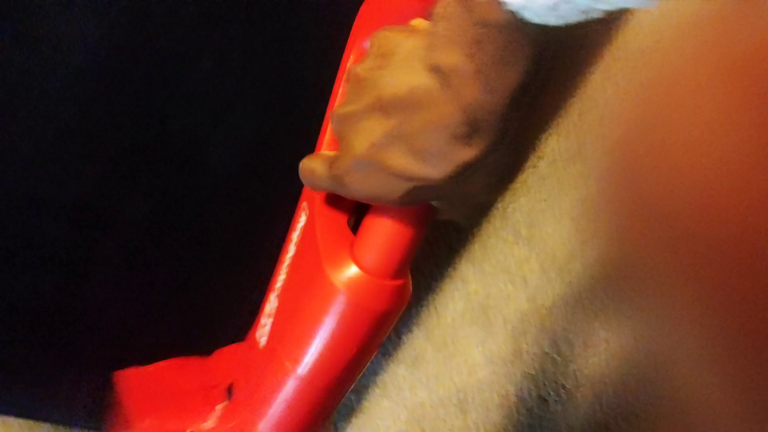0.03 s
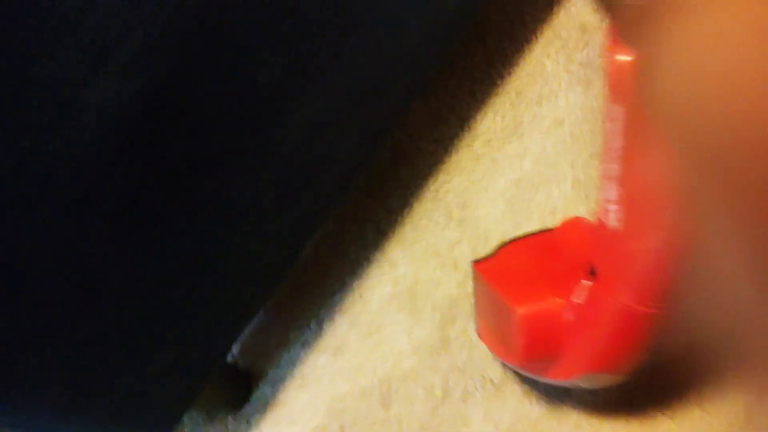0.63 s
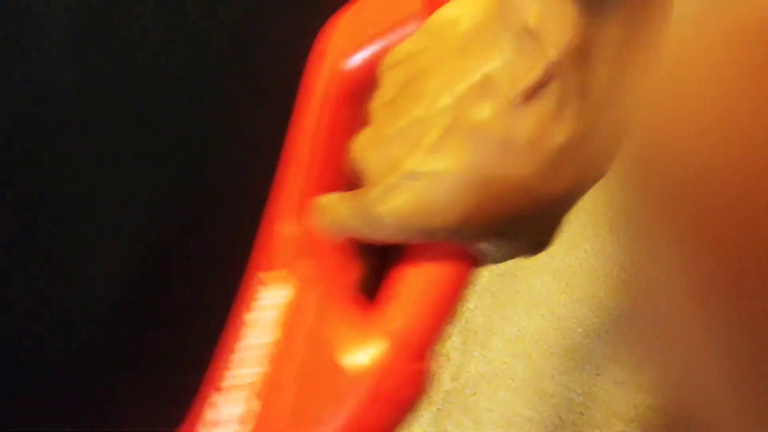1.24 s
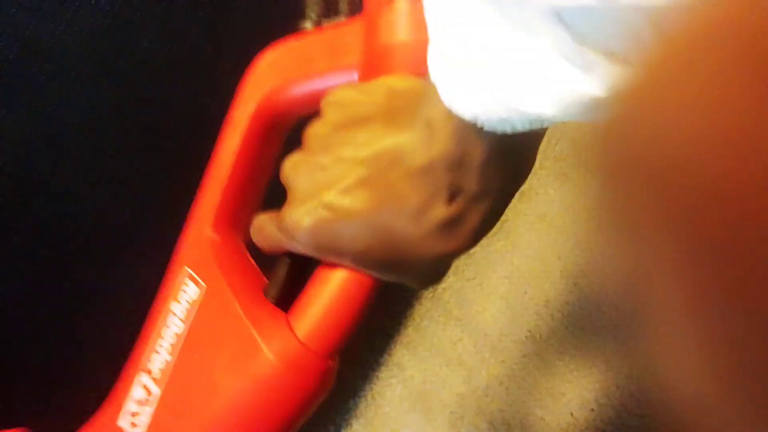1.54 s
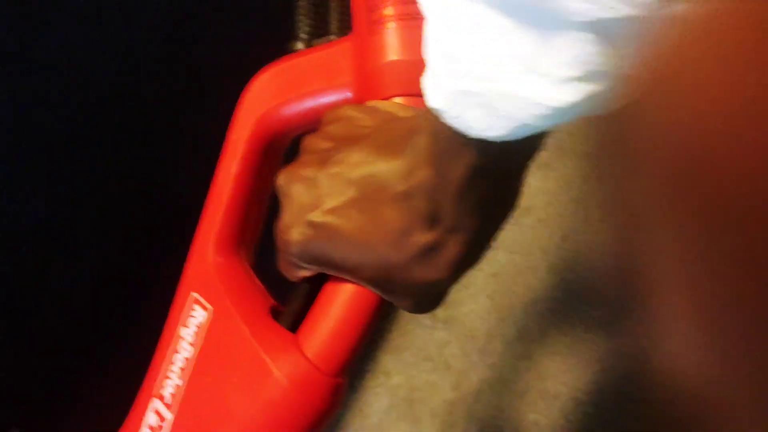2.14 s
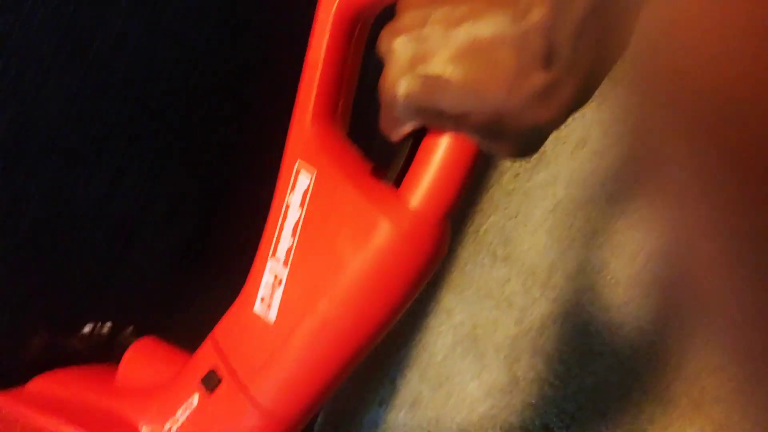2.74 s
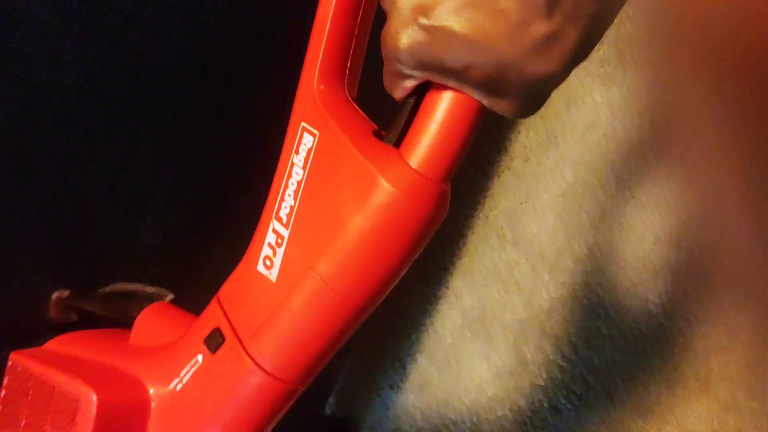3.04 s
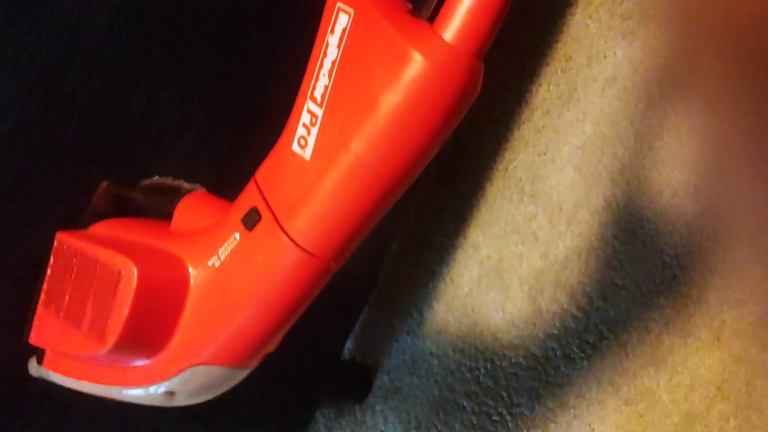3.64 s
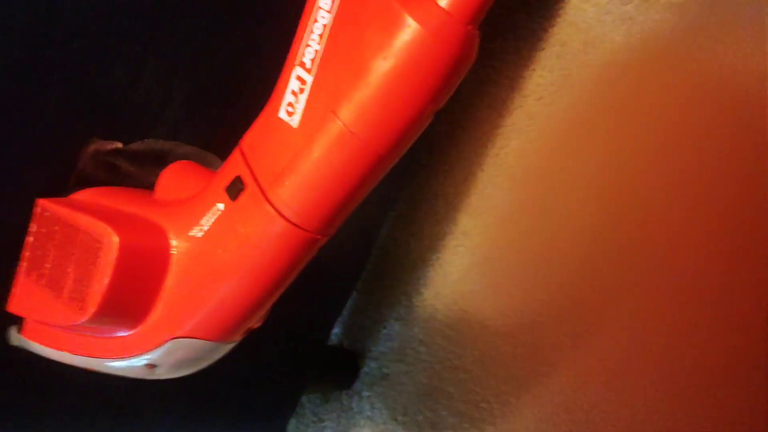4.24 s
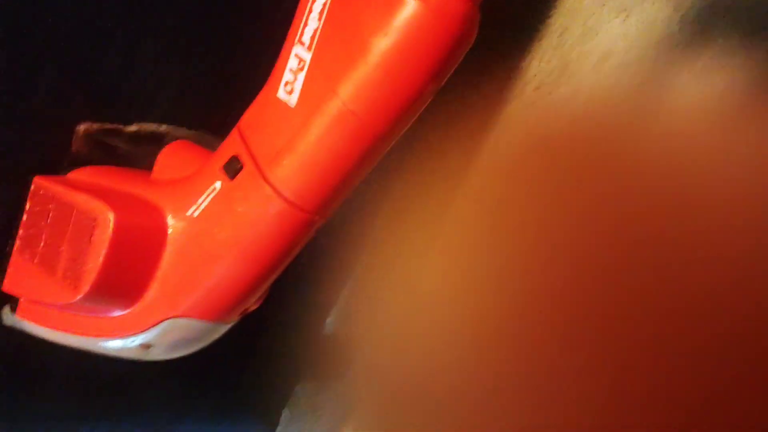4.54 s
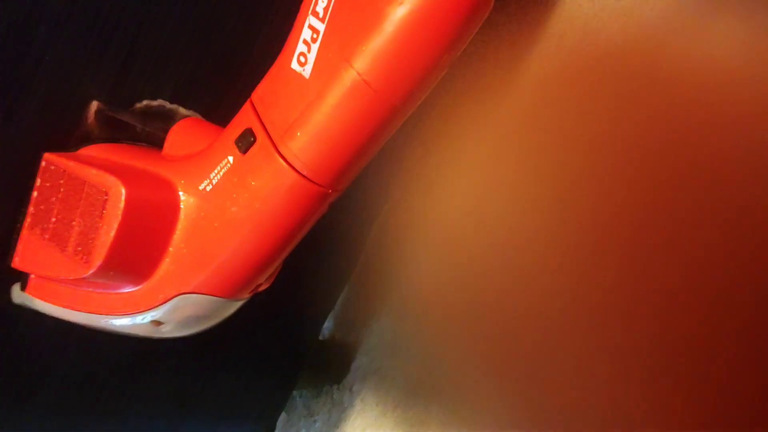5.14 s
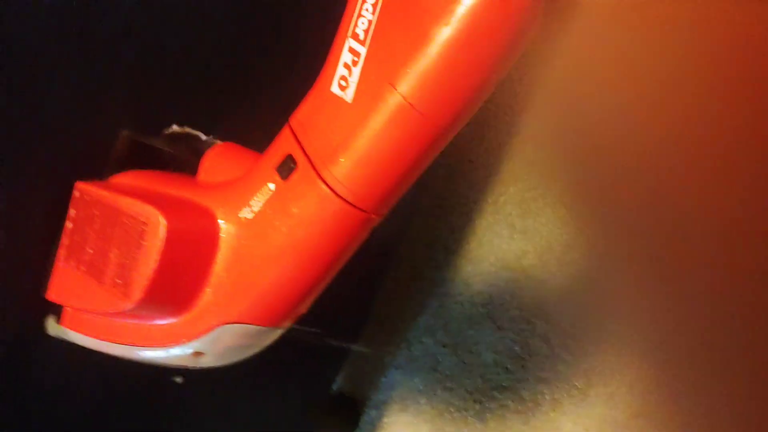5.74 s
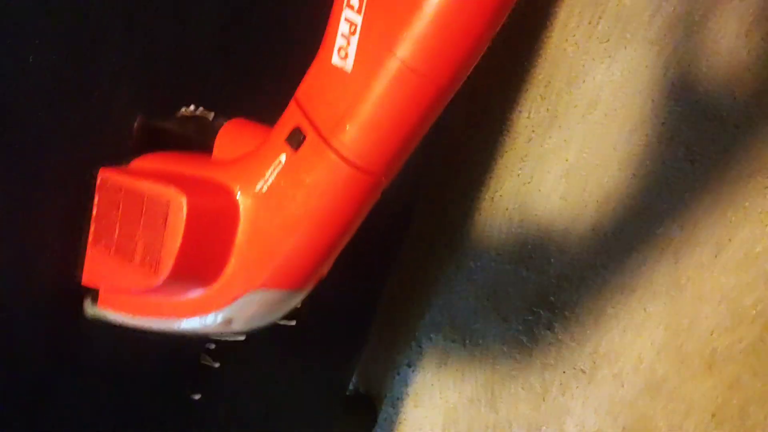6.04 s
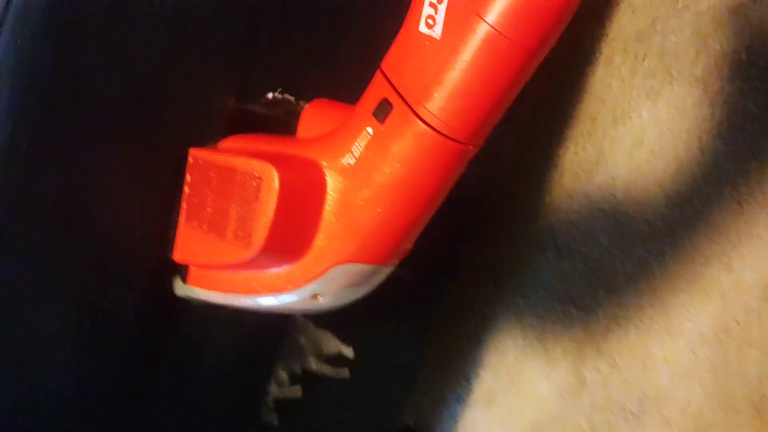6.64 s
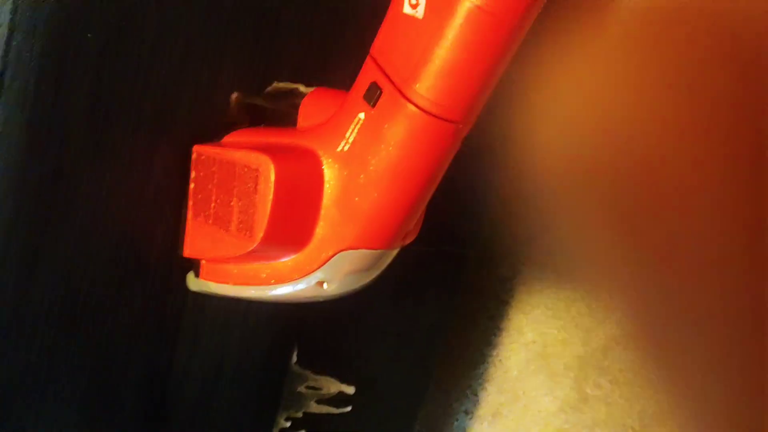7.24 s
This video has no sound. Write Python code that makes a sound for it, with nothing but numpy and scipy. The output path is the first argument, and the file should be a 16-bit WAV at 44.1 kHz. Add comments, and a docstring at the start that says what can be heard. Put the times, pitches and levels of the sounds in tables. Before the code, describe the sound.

Loud, steady suction motor with rushing, hissing air as an upholstery tool is drawn over fabric, with two dull microphone bumps.

```python
"""A loud motor hum and a rush of air fade in: a carpet cleaner, its plastic hand tool drawn over a sofa.
The unbalanced suction motor hums once a turn and whines at its blade and commutator rates.
Air roars through hose and tool; as the fabric seals the nozzle, the motor speeds up and the rush
brightens. A pump drones below, and the phone that listens close by is bumped twice."""
import sys
import numpy as np
from scipy import signal
from scipy.fft import irfft, next_fast_len
from scipy.io import wavfile
from scipy.ndimage import uniform_filter1d, minimum_filter1d

SR = 44100
rng = np.random.default_rng(int(sys.argv[2]) if len(sys.argv) > 2 else 0)


def generate_wav(sig):
    """Save sig (samples, or channels by samples) to the path in sys.argv[1] as 16-bit PCM at SR."""
    pcm = np.round(np.clip(np.atleast_2d(sig).T, -1, 1) * 32767).astype(np.int16)
    wavfile.write(sys.argv[1], SR, pcm)


N = 330309
FFT_SIZE = next_fast_len(N, real=True)
TIME_S, FREQ_HZ = np.arange(N) / SR, np.maximum(np.fft.rfftfreq(FFT_SIZE, 1 / SR), 1)
AIR_DB = -19  # reference for the levels of air, pump, overtones and whines
SIDES = np.array([[.5], [-.5]])  # pan_db and lead_rad are left minus right


def undb(db):
    """Decibels to gain."""
    return 10 ** (np.asarray(db) / 20)


def curves(table):
    """Table columns, interpolated over time."""
    time_s, *columns = np.transpose(table)
    return [np.interp(TIME_S, time_s, column) for column in columns]


def walk(rate_hz, count=1024):
    """Random drift, spread near 1, with rate_hz new values a second."""
    return np.interp(TIME_S * rate_hz, np.arange(count), rng.standard_normal(count))


def pan(db):
    """Constant-power left and right gains."""
    gains = undb(SIDES * db)
    return gains / np.sqrt(np.mean(gains ** 2, axis=0))


def colour(table):
    """Stereo gain per frequency, interpolated over log frequency."""
    freq_hz, *columns = np.transpose(table)
    level_db, pan_db = (np.interp(np.log(FREQ_HZ), np.log(freq_hz), column) for column in columns)
    return undb(level_db) * pan(pan_db)


def noise():
    """Spectrum of fresh white noise at 0 dB per Hz."""
    real, imag = rng.standard_normal((2, len(FREQ_HZ)))
    return (real + 1j * imag) * np.sqrt(FFT_SIZE * SR) / 2


def wave(spectrum):
    """Spectrum to waveform."""
    return irfft(spectrum, FFT_SIZE)[..., :N]


def resonate(modes, seal, flicker_db):
    """One flickering noise band per mode; seal_db is its level change at full seal."""
    out = 0
    for pitch_hz, width_hz, peak_db, seal_db, pan_db, lead_rad in modes:
        detuning = (FREQ_HZ - pitch_hz ** 2 / FREQ_HZ) / width_hz
        band = noise() / np.sqrt(1 + detuning ** 2) ** 3  # cubed for deep valleys
        stereo = wave(band * pan(pan_db) * np.exp(1j * lead_rad * SIDES))
        out += stereo * undb(peak_db + seal_db * seal + flicker_db * walk(25))
    return out


# Pump and mains tones: pitch_hz, level_db, seal_db
PUMP_TONES = [(58.1, -23, -0.5), (100, -30, 7), (120, -21.5, 0.5), (180, -19.5, -5), (198.5, -28, 3),
              (240, -31, 8)]

def pump(seal, waver_db=1.0):
    """Pump and mains shake the housing, alike in both channels."""
    out = 0
    for pitch_hz, level_db, seal_db in PUMP_TONES:
        tone = np.sqrt(2) * np.sin(2 * np.pi * (pitch_hz * TIME_S + rng.random()))
        out += tone * undb(level_db + seal_db * seal + waver_db * walk(19))
    return out


# Knocks, two per bump: start_s, pitch_hz, level_db, t60_s
KNOCKS = [(1.403, 137, -15.5, 0.16), (1.45, 45, -22.5, .35), (2.71, 120, -22, .16), (2.776, 85, -18, 0.16)]

def bumps(rise_s=0.013, slip_rad=0.9):
    """A hand knocks the phone: dull, damped swings, uneven as the skin slips."""
    out = 0
    for start_s, pitch_hz, level_db, t60_s in KNOCKS:
        age_s = np.maximum(TIME_S - start_s, 0)
        envelope = (1 - np.exp(-age_s / rise_s)) * undb(level_db - 60 * age_s / t60_s)
        out += envelope * np.sin(2 * np.pi * pitch_hz * age_s + slip_rad * walk(pitch_hz / 2))
    return out


# Exhaust spectrum: freq_hz, density_db, pan_db
ROAR_SPECTRUM = [(25, -66, 7), (48, -47.5, 3.5), (155, -41.5, 1.5), (310, -36, -1.5), (610, -37, 0.5),
                 (843, -36, -1.5), (1016, -39, 2), (1600, -49.5, -2.5), (2740, -37, -4.5),
                 (3100, -39.5, -1), (3140, -41, -4), (3440, -39, -3), (3750, -38.5, -8), (3930, -37.5, -8),
                 (4840, -44, 13), (5500, -46, 4), (7910, -55.5, -3.5), (8540, -92, -18)]
# Exhaust swell: time_s, gain_db
ROAR_SWELL = [(0.2, 0), (1.55, 0.5), (2.0, 1), (2.95, 0.5), (5.35, 1.5), (5.9, 1), (6.75, 2), (7.0, 1.5),
              (7.4, 2)]

def exhaust_roar(merge_hz=620, direct_share=0.19, left_lag_s=0.00023):
    """Exhaust air: coherent in the bass; higher up the room scatters all but a small direct share."""
    gain_db, = curves(ROAR_SWELL)
    coherence = np.clip(direct_share + (1 - direct_share) / (1 + (FREQ_HZ / merge_hz) ** 4), 0, .99)
    delay = np.exp(-2j * np.pi * FREQ_HZ * left_lag_s * np.array([[1], [0]]))
    direct = np.sqrt(coherence) * noise() * delay
    scattered = np.sqrt(1 - coherence) * np.array([noise(), noise()])
    return wave(colour(ROAR_SPECTRUM) * (direct + scattered)) * undb(gain_db)


# Housing and hose modes: pitch_hz, width_hz, peak_db, seal_db, pan_db, lead_rad
HOUSING_MODES = [(387, 36, -37.5, -9, 5, -0.62), (548, 90, -36.5, -6, 2, -.7), (738, 18, -35, 3, -2, -1),
                 (1027, 98, -37.5, -4.5, -1, -1.2), (1152, 16, -41, 6, 0, -1), (1254, 24, -38, 0, 0, -1),
                 (1776, 44, -39, 4, -6, 1)]
HOSE_MODES = [(372, 320, -35, -6, 2, -0.5), (1237, 490, -38.5, -3, 31, -1), (1693, 800, -32.5, -1, -11, 2),
              (2058, 510, -30, -2.5, -17.5, 2.5), (4615, 1350, -42.5, 7, -6.5, 0.4),
              (5890, 360, -45, 5.5, 0, -1.4), (6360, 580, -50.5, 6, 18, -1.5)]

def ducts(seal, clearance):
    """Turbulence rings the motor housing and hose, slightly louder with the nozzle off the fabric."""
    return resonate(HOUSING_MODES + HOSE_MODES, seal, flicker_db=0.9) * undb(clearance)


# Tool body and throat modes: pitch_hz, width_hz, peak_db, seal_db, pan_db, lead_rad
BODY_MODES = [(4275, 240, -35, -4, -10, -1.4), (4630, 380, -39.5, 2, -20, -.2)]
THROAT_MODES = [(2110, 270, -28, 3.2, -15.5, 2.5), (2270, 270, -26, -0.8, -13, 2.2)]
# Drive of body and throat: time_s, gain_db
BODY_DRIVE = [(.3, 1.5), (.58, -2), (.75, 2), (1.05, 0), (1.3, 2), (1.7, -3.5), (2.05, -3), (2.25, 5.5),
              (2.5, 2.5), (2.75, 4), (3.9, -1), (5, 0.5), (6.1, -1.5), (7.1, 1.5)]
THROAT_DRIVE = [(.2, -3), (1.5, -3.5), (1.65, -6), (2.05, 1), (2.35, -5.5), (2.8, 2.3), (3.95, -1.5),
                (4.5, 1), (5.3, -1), (6.4, -2.5), (6.6, -1.5), (7.2, 0)]

def hand_tool(seal):
    """Air rings the tool's body, and a jet sings in its throat."""
    body_db, = curves(BODY_DRIVE)
    throat_db, = curves(THROAT_DRIVE)
    body = resonate(BODY_MODES, seal, flicker_db=2.0) * undb(body_db)
    throat = resonate(THROAT_MODES, seal, flicker_db=0.16) * undb(throat_db)
    return body + throat


# Lip and slot modes: pitch_hz, width_hz, peak_db, seal_db, pan_db, lead_rad
LIP_MODES = [(6560, 340, -42, 0, -12, 2.7), (6735, 100, -39.5, -1.5, -14, 3.2),
             (6960, 300, -40.5, 3, -23, 2.5), (7210, 260, -43.5, 2.5, -18, 3)]
SLOT_MODES = [(367, 70, -42.5, 3.9, 4.5, -0.26), (2660, 790, -42.5, 5.3, -6.5, 1)]
# Lip hiss: time_s, gain_db
HISS_SWELL = [(0.2, 5), (0.5, 4), (0.55, 1), (0.85, 0.5), (1.1, 4), (1.25, -2), (1.55, -2), (1.65, -1),
              (1.95, -1), (2.3, 5), (3.3, 2.8), (5.1, 2.5), (5.9, 7), (6.1, 1.5), (7.0, 3.5), (7.4, 4.5)]
# Air over the fibres: freq_hz, density_db, pan_db
SPRAY_SPECTRUM = [(7000, -86, 2), (8570, -88, 3), (10020, -60.5, 2), (10100, -73, 6), (11440, -61, 9),
                  (12630, -70, 0), (14100, -87, -13)]

def nozzle(seal, clearance, grip_db=6):
    """Air hisses at the lip, sprays over the fibres and nearly whistles as fabric closes the slot."""
    hiss_db, = curves(HISS_SWELL)
    hiss = resonate(LIP_MODES, seal, flicker_db=1.0) * undb(hiss_db)
    whistle = resonate(SLOT_MODES, seal, flicker_db=1.0) * undb(grip_db * seal ** 4 - 11 * clearance)
    spray = wave(colour(SPRAY_SPECTRUM) * np.array([noise(), noise()]))
    spray_db = 3.0 * seal ** 2 + 0.4 * hiss_db + walk(90)
    return hiss + whistle + spray * undb(spray_db)


# Bands of whistling hiss: start_s, end_s, pitch_hz, width_hz, peak_db, pan_db, lead_rad
PASSING_BANDS = [(0.05, 1.55, 2430, 260, -32, -10, 2.1), (1.1, 1.55, 4400, 460, -38, -10, -1),
                 (1.18, 1.45, 3520, 420, -37, -10, -3), (1.56, 1.9, 2220, 85, -22.5, -18, 2.3),
                 (1.6, 1.9, 2350, 110, -28, -15, 2.2), (1.9, 2.85, 2410, 260, -29, -12, 2.1),
                 (2.1, 2.95, 5030, 260, -40.5, -20, 0), (2.15, 3.7, 3440, 170, -37, -9, -1),
                 (2.2, 4.3, 6280, 360, -46, -8, -1.5), (2.85, 3.45, 3350, 360, -37, -10, -1),
                 (3.7, 6.3, 3000, 650, -37.5, -18, 0), (3.6, 5.0, 2630, 130, -35, -5, 1.9),
                 (4.4, 4.95, 2130, 120, -27, -15, 2.5), (5.0, 6.1, 2620, 120, -29.5, -5, 2),
                 (5.35, 6.05, 6840, 170, -36, -18, 2), (5.45, 7.0, 7480, 440, -48, -10, 3),
                 (6.1, 6.35, 2640, 260, -32, -5, 1.1), (6.35, 6.75, 2690, 280, -27.5, -5, 1.1),
                 (6.1, 6.85, 3295, 120, -32, -8, -1.1), (6.2, 6.75, 3470, 200, -34, -13, -2.3),
                 (6.45, 6.75, 2985, 120, -28.5, -7, -1.1), (6.8, 7.6, 6860, 130, -33.5, -18, 2.1),
                 (6.85, 7.6, 2600, 340, -28.5, -12, 1.6), (6.9, 7.3, 4130, 260, -37, -4, .2),
                 (6.9, 7.6, 3250, 140, -35, -8, -1.1), (7.0, 7.4, 2260, 170, -26.5, -15, 2.2)]

def passing_bands(fade_s=0.11):
    """Narrow bands of whistling hiss come and go, each at its own pitch."""
    out = 0
    for start_s, end_s, pitch_hz, width_hz, peak_db, pan_db, lead_rad in PASSING_BANDS:
        envelope = np.clip(.5 + np.minimum(TIME_S - start_s, end_s - TIME_S) / fade_s, 0, 1)
        mode = (pitch_hz, width_hz, peak_db, 0, pan_db, lead_rad)
        out += envelope * resonate([mode], seal=0, flicker_db=2.0)
    return out


# Hum and whines, shifting as the phone moves through standing waves: time_s, level_db, pan_db
HUM_SWELL = [(0.2, -18, -0.2), (0.55, -18.5, 1.5), (1.4, -17.5, 0), (2.2, -15, 0.6), (3.05, -17, 1),
             (4.2, -16.5, 8.5), (5.05, -17, 9), (5.75, -21, 8), (6.3, -19.8, 7), (6.85, -23, 6),
             (7.4, -20, 5.5)]
LOW_WHINE_SWELL = [(.35, -18, 2), (.8, -15, 7), (1.2, -16.3, -1), (1.4, -24, -3), (1.75, -15.5, -3),
                   (1.97, -20, -2), (2.25, -12, -2), (2.6, -11.5, -6), (3.05, -22, 0), (3.55, -16.5, 3),
                   (4.1, -19, -4), (4.4, -21, 8), (5.0, -22, 8), (5.8, -23, -2), (6.2, -19.5, 5),
                   (6.7, -21, 10), (7.1, -23, -3), (7.4, -19, -1)]
HIGH_WHINE_SWELL = [(.35, -12.5, -9), (.6, -19, -11), (1.45, -15, -2.5), (1.85, -25, 0), (2.2, -12.7, -11),
                    (2.95, -15, -9), (3.2, -21, -10), (3.95, -21, -6), (4.15, -15, -13), (4.5, -18, -13),
                    (5.4, -21, -13), (5.65, -16, -17), (6.05, -22, -17), (6.3, -18, -17), (6.65, -25, -10),
                    (6.95, -16, -18), (7.35, -14, -16)]
# Hum overtones: shaft_multiple, level_db, pan_db, seal_db
HUM_OVERTONES = [(2, -26.5, 0, 5), (5, -38, 3, 20)]

def motor(shaft_hz, seal, jitter=0.000576, hum_lead_rad=-0.73, waver_db=2.5, tremble_db=1.6):
    """Imbalance hums once a turn with faint overtones; blades and commutator add trembling whines."""
    shaft_rad = 2 * np.pi * np.cumsum(shaft_hz * (1 + jitter * walk(24.8))) / SR
    hum_db, hum_pan_db = curves(HUM_SWELL)
    throb_db = 0.7 * walk(55) + 0.34 * walk(160, count=4096)
    out = np.sin(shaft_rad + hum_lead_rad * SIDES) * pan(hum_pan_db) * undb(hum_db + throb_db)
    partials = [(multiple, multiple * hum_lead_rad, db + seal_db * seal + waver_db * walk(7), pan_db)
                for multiple, db, pan_db, seal_db in HUM_OVERTONES]
    whines = [(10, 1.25, *curves(LOW_WHINE_SWELL)), (13, 2.4, *curves(HIGH_WHINE_SWELL))]
    for multiple, lead_rad, level_db, pan_db in partials + whines:
        gain = undb(AIR_DB + level_db + tremble_db * np.array([walk(41), walk(45)]))
        wander_rad = .35 * np.array([walk(6), walk(6.5)])  # shifting reflections at each microphone
        out += np.sin(multiple * shaft_rad + lead_rad * SIDES + wander_rad) * pan(pan_db) * gain
    return np.sqrt(2) * out


# Suction motor speed: time_s, shaft_hz
SHAFT_SPEED = [(0, 498.3), (2.87, 498.2), (3.25, 507.8), (3.75, 514.7), (4.4, 518.2), (4.9, 518.8),
               (5.5, 524), (6.5, 529.5), (6.8, 529.6), (7.49, 523.5)]

def scene(open_hz=498, sealed_hz=527, touchdown_s=1.9, flutter_db=0.33):
    """Air, pump, motor and bumps; a choked fan runs faster, so shaft speed gives the seal."""
    shaft_hz, = curves(SHAFT_SPEED)
    seal = np.clip((shaft_hz - open_hz) / (sealed_hz - open_hz), 0, 1)
    clearance = np.maximum(touchdown_s - TIME_S, 0) / 4.2  # nozzle nears the fabric, then rests on it
    rush = exhaust_roar() + ducts(seal, clearance) + hand_tool(seal) + nozzle(seal, clearance)
    air = (rush + passing_bands()) * undb(flutter_db * walk(45))
    return (air + pump(seal)) * undb(AIR_DB) + motor(shaft_hz, seal) + bumps()


def record(dry, start_s=.069, start_db=-32, fade_tau_s=0.44, ceiling=.93, cutoff_hz=14200):
    """The phone opens its microphones, fades them up, limits the peaks and cuts the top."""
    age_s = np.maximum(TIME_S - start_s, 0)
    fade = 1 - (1 - undb(start_db)) * np.exp(-age_s / fade_tau_s)
    heard = dry * (age_s > 0) * fade
    headroom = ceiling / np.maximum(np.abs(heard), ceiling)
    limiter_gain = uniform_filter1d(minimum_filter1d(headroom, size=65), size=65)
    lowpass = signal.ellip(8, .2, 70, cutoff_hz, fs=SR, output="sos")
    return signal.sosfilt(lowpass, heard * limiter_gain)


dry = scene()
out = record(dry)
generate_wav(out)
```